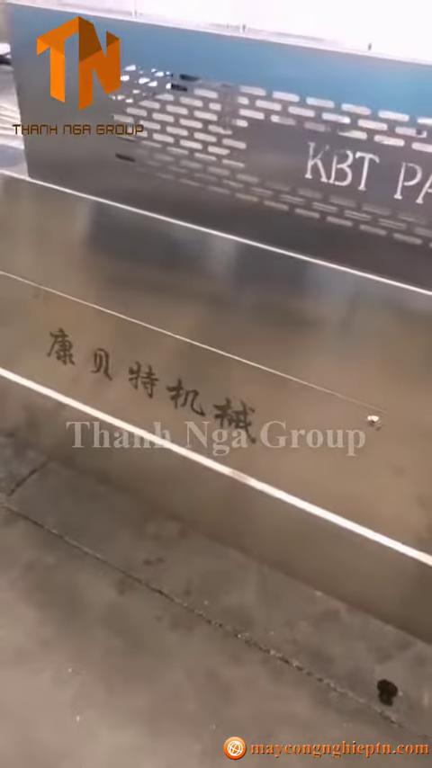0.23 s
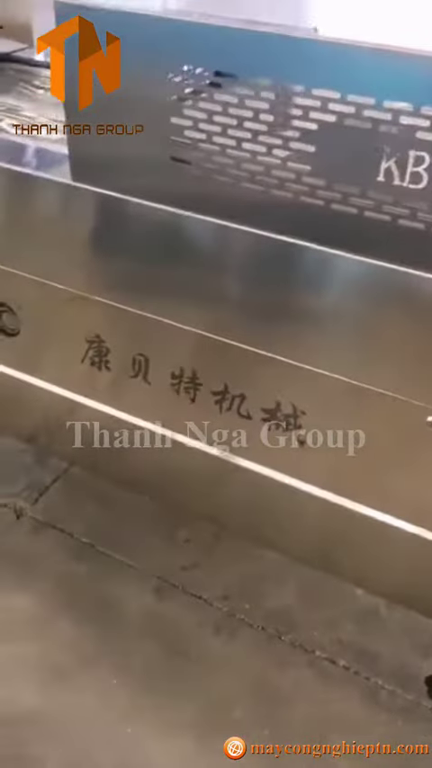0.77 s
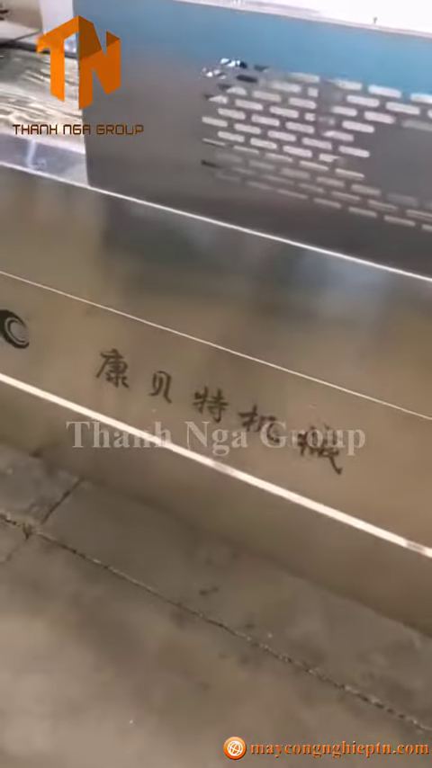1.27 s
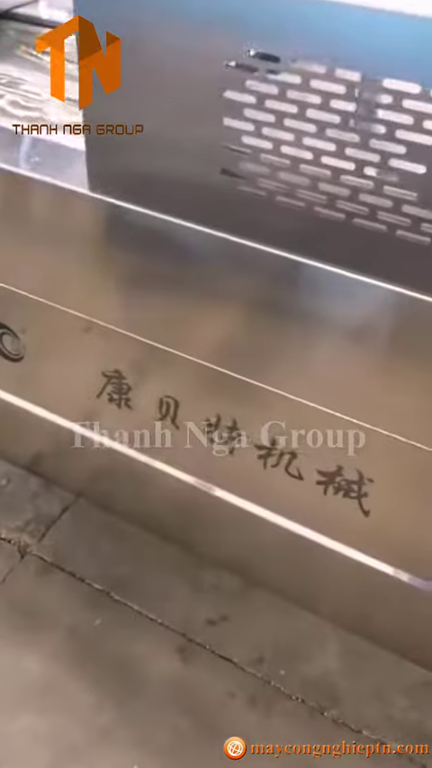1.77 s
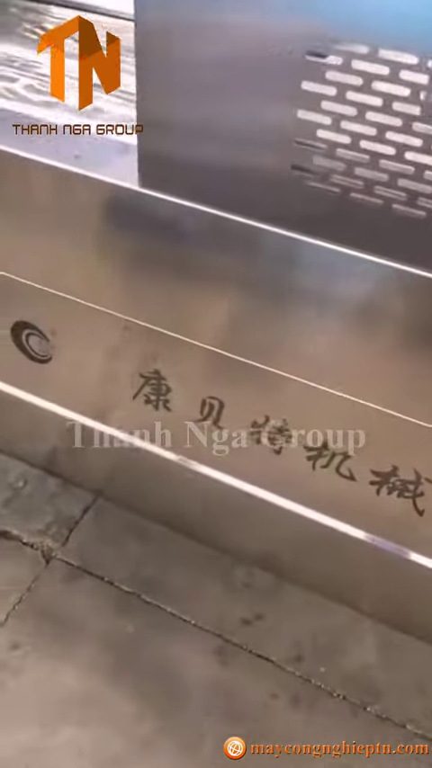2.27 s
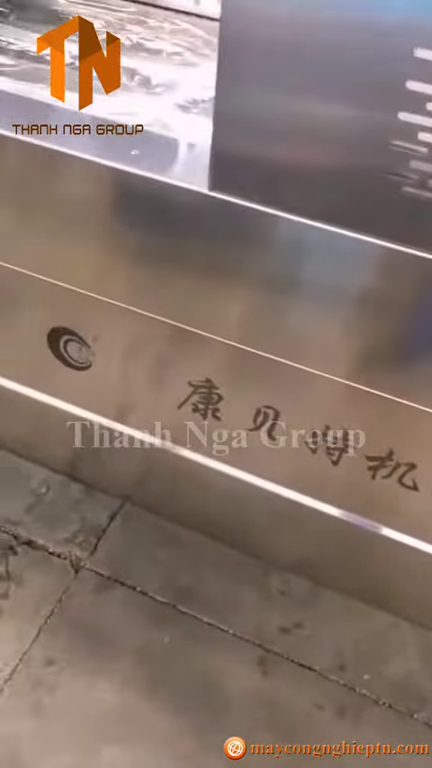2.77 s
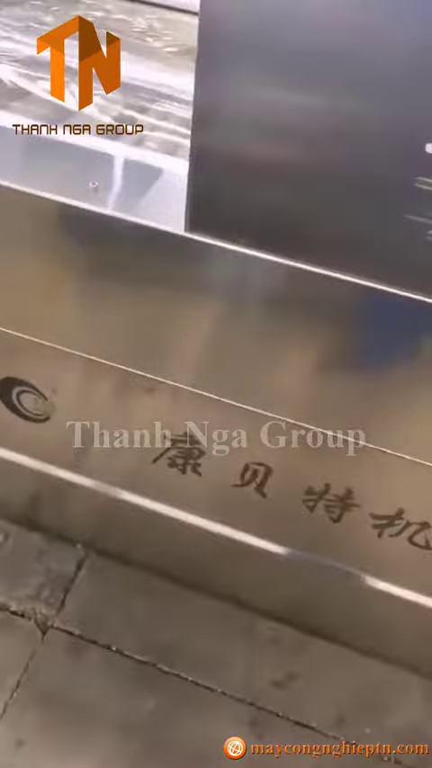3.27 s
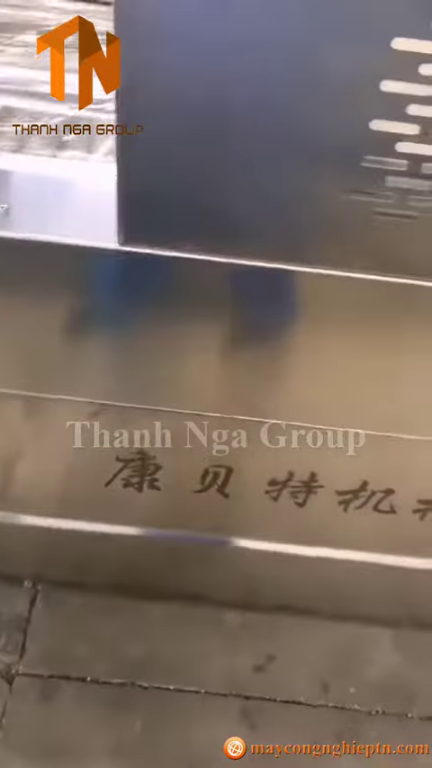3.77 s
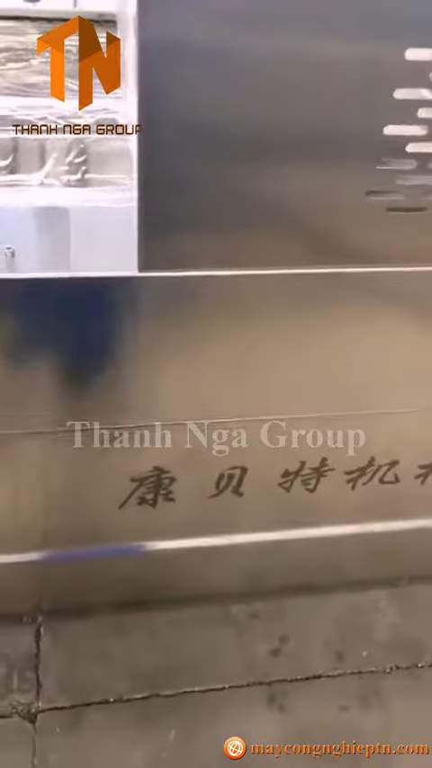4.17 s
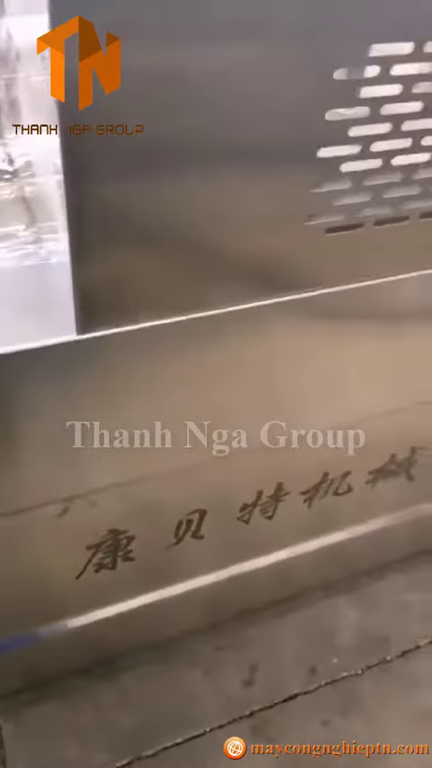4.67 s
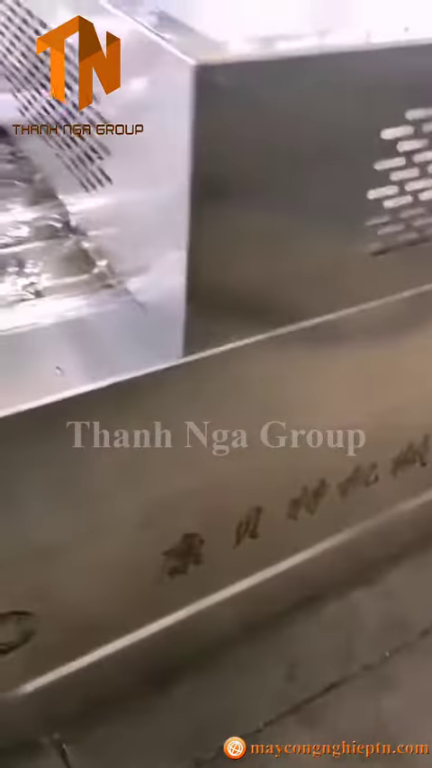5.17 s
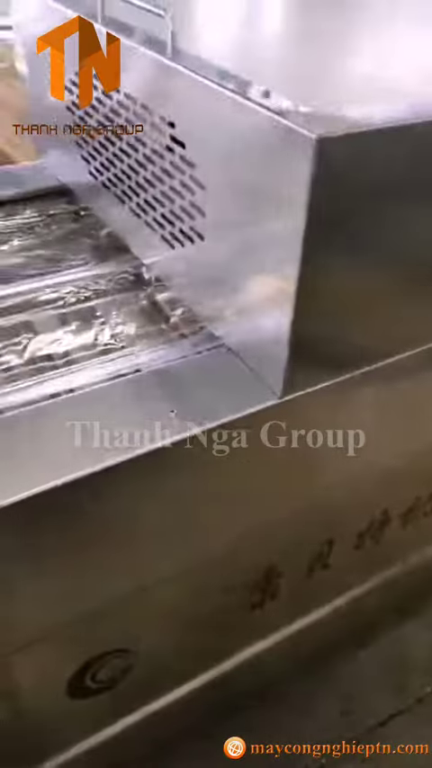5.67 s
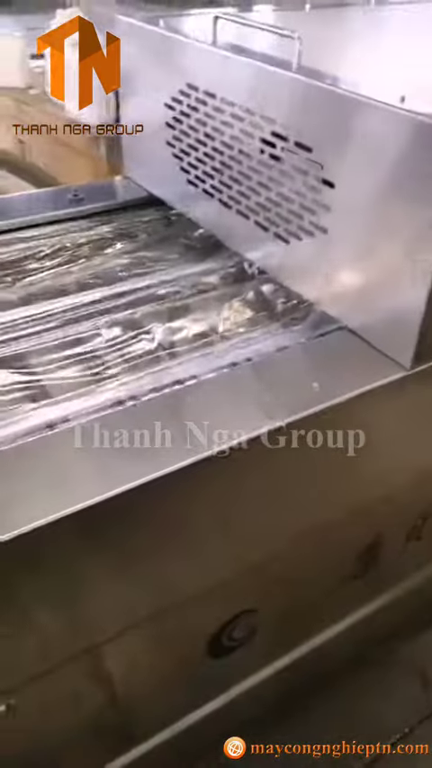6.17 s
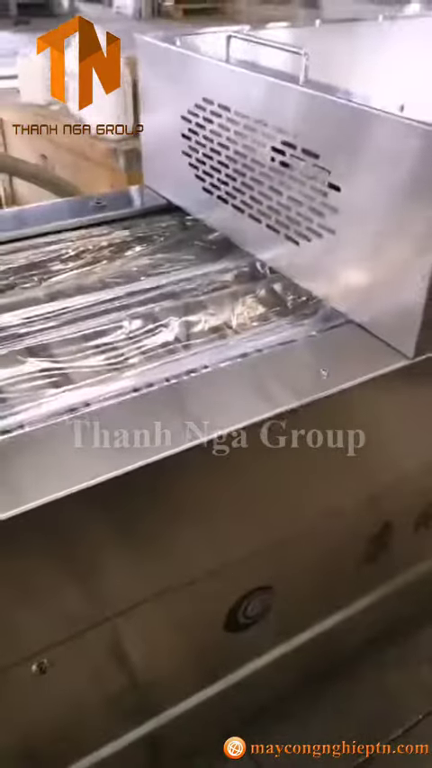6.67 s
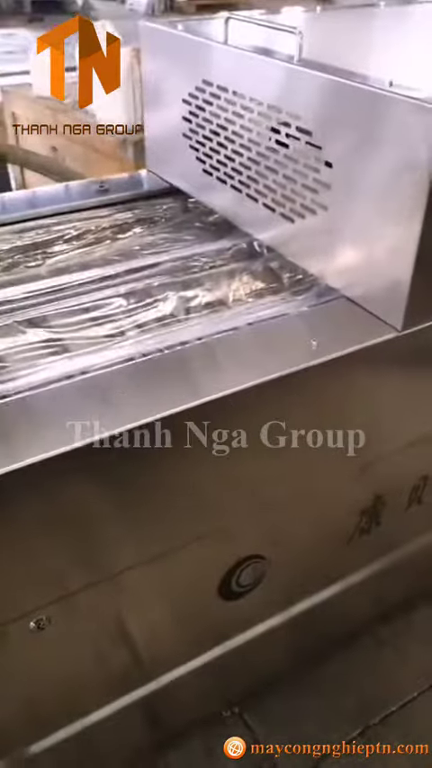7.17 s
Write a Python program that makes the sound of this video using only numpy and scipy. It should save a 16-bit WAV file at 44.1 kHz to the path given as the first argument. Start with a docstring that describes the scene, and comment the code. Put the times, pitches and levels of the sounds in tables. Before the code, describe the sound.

Close beside a conveyor vacuum packer in a noisy factory hall, a loud jet of air hisses for about a second and the chamber lid knocks free. The belt rumbles quietly with rustling film bags and a few faint squeaks. A second, longer hiss follows, half whistling. Then a low pump hum starts and the lid thuds shut amid three short puffs of air.

```python
"""A conveyor vacuum packer works through one cycle in a humming factory hall, heard beside its housing.
A turbulent jet hisses through a valve, and the chamber lid knocks free, ringing the modes of the frame.
The belt drags into motion and rumbles on, with rustling film bags and a few faint friction squeaks.
A second long jet, half whistling, lowers the lid. The pump starts to hum, the lid thuds shut amid
short puffs of air, and the valve gives one last puff."""
import sys
import numpy as np
from scipy import signal
from scipy.fft import rfft, irfft, next_fast_len
from scipy.io import wavfile
from scipy.ndimage import uniform_filter1d

SR = 44100
rng = np.random.default_rng(int(sys.argv[2]) if len(sys.argv) > 2 else 0)


def generate_wav(signal):
    """Clip the signal to [-1, 1] and save it as 16-bit WAV at the path in sys.argv[1]."""
    frames = np.transpose(np.atleast_2d(signal))
    scaled = np.clip(frames, -1, 1) * 32767
    pcm = np.round(scaled).astype(np.int16)
    wavfile.write(sys.argv[1], SR, pcm)


N = 326781
TIME = np.arange(N) / SR

# other machines in the hall, louder as the listener moves along: time_s, level_db
HALL_LEVEL = [(0, -46.8), (2.25, -46.5), (2.7, -43.7), (5.0, -41.8), (7.41, -42)]
# spectrum of the frame's deep shudder under load: frequency_hz, density_db
SHUDDER_SPECTRUM = [(25, -14), (60, -1), (100, 1), (160, 2), (230, -2), (500, -22)]


def from_db(db):
    """Decibels to amplitude ratio."""
    return 10 ** (np.asarray(db) / 20)


def rms_one(x):
    """Scale to unit rms."""
    return x / np.sqrt(np.mean(x ** 2) + 1e-20)


def level(rows):
    """Amplitude along a curve of (time_s, level_db), silent beyond its ends."""
    s, db = np.transpose(rows)
    return from_db(np.interp(TIME, s, db)) * (TIME >= s[0] - .03) * (TIME <= s[-1] + .05)


def gate(start_s, stop_s, attack_s, fall_db_per_s):
    """Smooth onset around start_s, a hold at 1, and exponential decay from stop_s."""
    rise = .5 + .5 * np.tanh(2 * (TIME - start_s) / attack_s)
    return rise * from_db(-fall_db_per_s * np.maximum(TIME - stop_s, 0))


def swell(centre_s, length_s, db):
    """Gaussian envelope."""
    return from_db(db) * np.exp(-(2 * (TIME - centre_s) / length_s) ** 2)


def drift(rate_hz):
    """Random modulation: low-passed noise of unit rms."""
    hz = np.arange(N // 2 + 1) * SR / N
    return rms_one(irfft(rfft(rng.standard_normal(N)) / (1 + (hz / rate_hz) ** 2), N))


def noise(spectrum, resonances=()):
    """Source and filter: white noise shaped by a broad spectrum and Lorentzian peaks, at unit rms."""
    size = next_fast_len(N, True)
    hz = np.maximum(np.arange(size // 2 + 1) * SR / size, 1)
    points_hz, db = np.transpose(spectrum)
    roll_off = np.minimum(hz / points_hz[0], 1) * np.minimum(points_hz[-1] / hz, 1)
    gain = from_db(np.interp(np.log(hz), np.log(points_hz), db)) * roll_off ** 2
    peak_power = sum(from_db(2 * peak_db) / (1 + (2 * (hz - centre) / width) ** 2)
                     for centre, width, peak_db in resonances)
    white = rfft(rng.standard_normal(size))
    return rms_one(irfft(white * gain * np.sqrt(1 + peak_power), size)[:N])


def patches(hz, s, span_hz, hold_s):
    """Random field of unit rms, smooth in time and independent from band to band."""
    smoothing = np.exp(-(np.fft.rfftfreq(len(s), s[1]) * hold_s) ** 2)
    field = irfft(rfft(rng.standard_normal((len(hz), len(s)))) * smoothing, len(s))
    band = (hz / max(span_hz, hz[1])).astype(int)
    return rms_one(field[band])


def hall_noise():
    """Incoherent sources: the other machines add up to a broad, slightly wavering noise."""
    # spectrum of the hall: frequency_hz, density_db
    spectrum = [(25, -7), (70, -4.5), (150, -3.5), (300, 0), (700, -1.5), (1300, -1), (1750, 0), (2200, -2),
                (2950, 3), (4000, -4), (5700, -3), (6900, -10), (8200, -9), (9400, -19), (12500, -19),
                (14000, -34)]
    return level(HALL_LEVEL) * noise(spectrum) * from_db(.5 * drift(13))


def shimmer(x, hollow_share, depth_db=3.05, even_span_hz=1800, size=2048):
    """Spectral modulation: narrow bands swell and fade and hollows open, while broad bands keep level."""
    # depth of the passing hollows: frequency_hz, gain_db
    hollows = [(1600, -2), (2100, -28), (2700, -24), (3100, -16), (3800, -19), (4700, -13), (5400, -3),
               (6200, -3), (6900, -13), (8000, -3), (10500, -10), (14000, -5)]
    frames = dict(nperseg=size, noverlap=3 * size // 4)
    hz, s, cells = signal.stft(x, SR, **frames)
    bands_db = depth_db * patches(hz, s, span_hz=95, hold_s=.07)
    chance = patches(hz, s, span_hz=170, hold_s=.11)
    gaps = np.clip(3 * (chance - .65), 0, 1)  # hollows open above a threshold
    hollow_db = np.interp(hz, *np.transpose(hollows))[:, None]
    gain = from_db(bands_db + np.interp(s, TIME, hollow_share) * gaps * hollow_db)
    broad_power = uniform_filter1d(gain ** 2, int(even_span_hz / hz[1]) + 1, axis=0)
    return signal.istft(cells * gain / np.sqrt(broad_power), SR, **frames)[1][:N]


def conveyor(lumpy_db=1.6):
    """Forced vibration: the belt drags and rolls unevenly; its jolts drive the panels and the frame."""
    # the belt stops, later creeps, runs and drops to idle: time_s, level_db
    belt_level = [(0, -50), (0.3, -68), (1.58, -70), (1.66, -53), (2.53, -54), (2.67, -47.8), (2.85, -48),
                  (3.0, -46.3), (4.1, -46.3), (4.6, -57), (7.41, -58.5)]
    # jolts of the belt: centre_s, length_s, boom_db, shudder_db
    jolts = [(1.69, 0.15, -45, -72), (2.96, 0.16, -43.2, -62), (3.06, .1, -45, -55), (3.15, .08, -46, -59),
             (3.29, 0.15, -48, -47.5)]
    # resonances of the side panels: centre_hz, width_hz, peak_db
    panels = [(232, 34, 0), (294, 16, 6)]
    # spectra of the drive, the jolted panels and the dragging belt: frequency_hz, density_db
    drive_spectrum = [(50, -37), (110, -10), (180, -5.5), (280, 0), (400, -5), (650, -10), (900, -10.5),
                      (1500, -14), (3000, -44)]
    jolt_spectrum = [(130, -10), (200, -2), (290, 0), (480, -10), (900, -24)]
    drag_spectrum = [(150, -18), (330, -6), (600, 5), (760, -12), (950, -4), (1700, -8), (3500, -15),
                     (9000, -27)]
    rumble = level(belt_level) * noise(drive_spectrum, panels)
    boom = sum(swell(s, length, db) for s, length, db, _ in jolts) * noise(jolt_spectrum, panels)
    loaded = from_db(-54.5) * gate(3.25, 3.9, attack_s=.7, fall_db_per_s=3.5)
    jolted = sum(swell(s, length, db) for s, length, _, db in jolts)
    shudder = (loaded + jolted) * noise(SHUDDER_SPECTRUM)
    drag = from_db(-45) * gate(1.609, 1.745, attack_s=.016, fall_db_per_s=260) * noise(drag_spectrum)
    return (rumble + boom + shudder + drag) * from_db(lumpy_db * drift(9.5))


def valve(opening, attack_s):
    """Pressure-driven flow: it starts fast, sags with the pressure and dies once the valve shuts."""
    open_s, close_s, db, sag_db_per_s, fall_db_per_s = opening
    open_for_s = np.clip(TIME - open_s, 0, close_s - open_s)
    return gate(open_s, close_s, attack_s, fall_db_per_s) * from_db(db - sag_db_per_s * open_for_s)


def air_blast(flow, jet, ports, flutter_db, sputter_db, echo_db):
    """Jet noise: turbulence excites the resonances of valve and silencer, and sputters in its low range."""
    hiss = flow * noise(jet, ports) * from_db(flutter_db * drift(30))
    low = signal.sosfiltfilt(signal.butter(2, 4500, fs=SR, output="sos"), hiss)
    hiss = hiss - low + low * from_db(sputter_db * drift(28))
    return hiss + from_db(echo_db) * hall_echo(hiss)


def lift_air(attack_s=.011, filled_at_s=.81, filling_s=.16, drop_db=6):
    """Pressure equalisation: air rushes in with a low roar, and the jet weakens as the chamber fills."""
    # valve opening: open_s, close_s, level_db, sag_db_per_s, fall_db_per_s
    opening = (0.099, 1.217, -19.2, 4.0, 310)
    # spectra of the jet and the low roar: frequency_hz, density_db
    jet = [(100, -25), (300, -23), (1300, -16.5), (1900, -5), (2300, -5), (2900, -3), (4200, -3.2),
           (7000, -6.3), (8400, -4), (9100, -7.5), (12800, -3.5), (14000, -6)]
    roar_spectrum = [(40, -5), (130, -5), (450, -5), (850, 2), (1300, -4), (2500, -12)]
    # valve and silencer resonances: centre_hz, width_hz, peak_db
    ports = [(2780, 220, 0), (5700, 1100, 6.5), (7780, 560, 10.5)]
    open_s = opening[0]
    filled = np.clip((TIME - filled_at_s) / filling_s, 0, 1)
    flow = valve(opening, attack_s) * from_db(-drop_db * filled)
    hiss = air_blast(flow, jet, ports, flutter_db=.6, sputter_db=1.2, echo_db=-10.5)
    rush = from_db(-39) * gate(open_s, open_s + .11, attack_s, fall_db_per_s=45)
    return hiss + rush * noise(roar_spectrum)


def hall_echo(x, t60_s=.6, delay_s=.012, dull_hz=6500):
    """Reverberation: diffuse reflections decay exponentially, duller than their source."""
    t = TIME[:SR]
    tail = rng.standard_normal(SR) * from_db(-60 * t / t60_s) * (t > delay_s)
    echo = signal.fftconvolve(x, tail / np.sqrt(np.sum(tail ** 2)))[:N]
    return signal.sosfilt(signal.butter(2, dull_hz, fs=SR, output="sos"), echo)


def ring(force, hz, t60_s):
    """Damped harmonic oscillator: one mode driven by a force."""
    radius, angle = from_db(-60 / (t60_s * SR)), 2 * np.pi * hz / SR
    return signal.lfilter([0, np.sin(angle)], [1, -2 * radius * np.cos(angle), radius ** 2], force + 1e-18)


def knocks(rattle=.85):
    """Impact excitation: a push and a brief rattle ring the frame; harder contacts reach higher modes."""
    # lid and frame impacts with their bounces: start_s, force_db, contact_hz, rattle_s
    impacts = [(1.2, -38.5, 220, .018), (1.215, -40, 400, .02), (1.242, -38.5, 350, .022),
               (1.288, -45.5, 400, .02), (1.312, -46, 220, .015), (1.35, -50, 420, .01),
               (1.607, -45.5, 1300, .04), (4.39, -43.5, 300, 0.024), (6.384, -37, 140, .05),
               (6.637, -44, 150, .01), (6.7, -35, 380, .012), (6.713, -32, 720, .016),
               (6.738, -32, 620, .03), (6.777, -34.5, 160, .03), (6.82, -40.5, 380, .08),
               (6.933, -44, 277, .03), (7.238, -36.5, 300, 0.035), (7.257, -36.5, 2400, .035)]
    # modes of the steel frame: pitch_hz, gain_db, t60_s
    modes = [(87, -4, 0.1), (110, 3.5, 0.1), (148, 2.5, 0.1), (182, 2.5, 0.11), (223.3, -1.5, 0.12),
             (275, 1.5, 0.14), (310, 7, 0.04), (358, 1, 0.13), (424, 3, 0.07), (526, -2, 0.13),
             (623, 4, 0.08), (760, -3, .07), (855, -1.5, 0.06), (1040, -4, .06), (1420, -2, .05)]
    force = np.zeros(N)
    t = TIME[:SR // 3]
    for start_s, force_db, contact_hz, rattle_s in impacts:
        blow = rattle * rng.standard_normal(len(t)) * np.exp(-t / rattle_s) / np.sqrt(rattle_s * SR)
        blow[0] += 1  # the push
        contact = signal.butter(2, [contact_hz / 3, contact_hz], "band", fs=SR, output="sos")
        at = int(start_s * SR)
        force[at:at + len(t)] += from_db(force_db) * signal.sosfilt(contact, blow)[:N - at]
    return sum((-1) ** k * from_db(db) * ring(force, hz, t60) for k, (hz, db, t60) in enumerate(modes))


def film_bags(crinkle_db=2.5):
    """Amplitude-modulated noise: film bags shaken on the belt give a bright, flickering rustle."""
    # rustles: centre_s, length_s, level_db
    rustles = [(1.88, 0.8, -56.5), (3.17, 0.95, -52.7), (4.0, 0.7, -64)]
    # spectrum of the film: frequency_hz, density_db
    spectrum = [(2000, -28), (6000, 5), (10000, 0), (14000, -1)]
    return sum(swell(*rustle) for rustle in rustles) * noise(spectrum) * from_db(crinkle_db * drift(40))


def squeaks(waver_hz=18, stutter_db=2.8):
    """Friction-induced vibration: rubbing guides sing briefly, a little rough in pitch and strength."""
    # squeaks of the guides: centre_s, length_s, pitch_hz, level_db
    rubs = [(2.44, 0.12, 2355, -46.3), (2.65, 0.075, 5890, -50.5), (2.755, 0.075, 5865, -46.5),
            (2.755, .035, 2355, -51), (2.88, .16, 5870, -54), (3.07, .1, 5890, -56)]
    tones, wobble_hz = np.zeros(N), waver_hz * drift(104)
    for centre_s, length_s, pitch_hz, db in rubs:
        phase = 2 * np.pi * np.cumsum(pitch_hz + wobble_hz) / SR
        tones += swell(centre_s, length_s, db) * np.sqrt(2) * np.sin(phase)
    return tones * from_db(stutter_db * drift(50))


def lower_air(throat_db=-19, throat_rise_db_per_s=5.5, whistle_db=-19):
    """Jet noise lowering the lid: it grows throatier as pressure falls, and a narrow band half whistles."""
    # valve opening: open_s, close_s, level_db, sag_db_per_s, fall_db_per_s
    opening = (4.404, 6.29, -20.15, 1.8, 90)
    # early surge of the flow, and moments when the whistle catches: centre_s, length_s, level_db
    surge = (4.505, 0.06, -30)
    catches = [(5.0, .1, -24.5), (5.075, .06, -29), (5.19, .09, -29), (5.65, .05, -30), (6.01, .06, -32)]
    # spectra of the jet, its throaty rush and its whistle: frequency_hz, density_db
    jet = [(100, -59), (600, -24.5), (1200, -20), (1750, -4.5), (2150, -7.5), (2950, -2), (4250, -2.5),
           (4600, -6), (5100, -3), (6700, -8), (7200, -5), (8800, -5), (10200, -9.5), (12300, -5),
           (14000, -11)]
    throat_spectrum = [(1700, -12), (2500, -7), (2950, 0), (3800, -4), (4500, -14)]
    whistle_spectrum = [(5200, -16), (5720, 2), (5870, 12), (6070, 3), (6400, -27)]
    # valve and silencer resonances: centre_hz, width_hz, peak_db
    ports = [(5500, 440, 2), (6000, 500, 4), (7600, 890, -2), (9580, 260, 3)]
    flow = valve(opening, attack_s=.019) + swell(*surge)
    open_s, close_s = opening[:2]
    open_for_s = np.clip(TIME - open_s, 0, close_s - open_s)
    throat = flow * from_db(throat_db + throat_rise_db_per_s * open_for_s) * noise(throat_spectrum)
    catching = sum(swell(*catch) for catch in catches)
    whistle = (from_db(whistle_db) * flow + catching) * noise(whistle_spectrum)
    hiss = air_blast(flow, jet, ports, flutter_db=.85, sputter_db=.9, echo_db=-16)
    return hiss + throat * from_db(2 * drift(25)) + whistle


def pump(start_s=6.38, attack_s=.05, start_hz=98, run_hz=72, sag_s=.17, waver=.014):
    """Periodic forcing: the pump's harmonic hum surges and sags in pitch under load; the frame shudders."""
    # harmonics of the pump: multiple, relative_db
    harmonics = [(1, 12), (2, -11), (3, -10), (4, -20)]
    # starting surge: centre_s, length_s, level_db
    surge = (6.46, 0.11, -46)
    age_s = np.maximum(TIME - start_s, 0)
    running = np.minimum(age_s / attack_s, 1)
    pitch_hz = run_hz + (start_hz - run_hz) * np.exp(-age_s / sag_s)
    phase = 2 * np.pi * np.cumsum(pitch_hz * (1 + waver * drift(12.6))) / SR
    tone = rms_one(sum(from_db(db) * np.sin(multiple * phase) for multiple, db in harmonics))
    hum = (from_db(-53) + swell(*surge)) * tone
    shudder = from_db(-53) * noise(SHUDDER_SPECTRUM)
    return running * (hum + shudder)


def puffs():
    """Transient jets: one small valve lets out short puffs as the lid seats."""
    # valve openings: open_s, close_s, level_db, sag_db_per_s, fall_db_per_s
    openings = [(6.393, 6.566, -25.4, 10, 200), (6.647, 6.752, -27.4, 30, 240),
                (7.21, 7.263, -26.7, 62, 480)]
    # spectrum of the jet: frequency_hz, density_db
    jet = [(200, -18), (1300, -12), (2200, -1.5), (3000, 4), (4200, -3), (5200, -2.5), (7000, 0),
           (10000, -5.5), (11500, -1.5), (14000, -3)]
    # valve and silencer resonances: centre_hz, width_hz, peak_db
    ports = [(5630, 580, 5.5), (8100, 700, 2)]
    flow = sum(valve(opening, attack_s=.024) for opening in openings)
    return air_blast(flow, jet, ports, flutter_db=.3, sputter_db=.8, echo_db=-15)


def scene():
    """Superposition: all sources add in mono; the hiss is most hollow while air blows."""
    air = lift_air() + lower_air() + puffs()
    thuds = knocks()
    air_power = np.abs(uniform_filter1d(air ** 2, size=1024))
    air_share = air_power / (air_power + level(HALL_LEVEL) ** 2)
    hiss = shimmer(air + hall_noise(), hollow_share=np.maximum(air_share, .15))
    echo = hall_echo(from_db(-11) * thuds)
    mono = hiss + thuds + echo + conveyor() + film_bags() + squeaks() + pump()
    return np.array([mono, mono])


def record(dry, cutoff_hz=14150):
    """Band limiting: a steep low-pass filter removes the highest treble."""
    return signal.sosfilt(signal.ellip(12, .1, 80, cutoff_hz, fs=SR, output="sos"), dry)


dry = scene()
out = record(dry)
generate_wav(out)
```